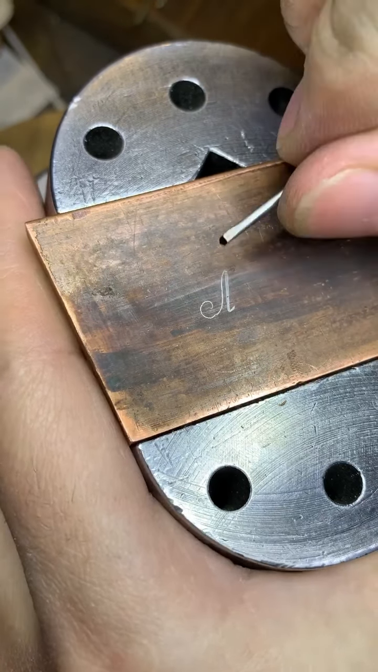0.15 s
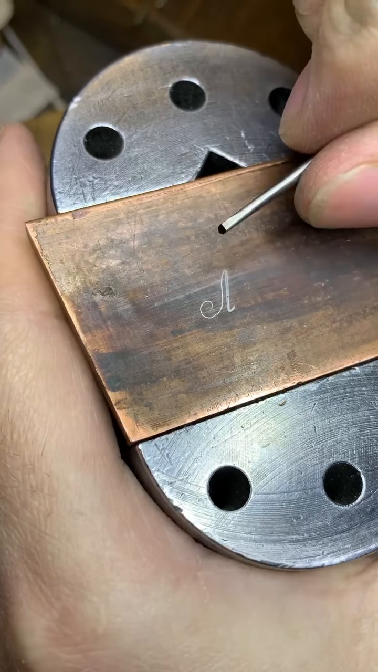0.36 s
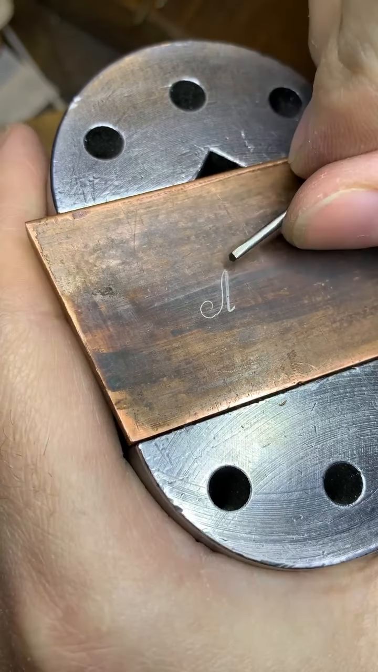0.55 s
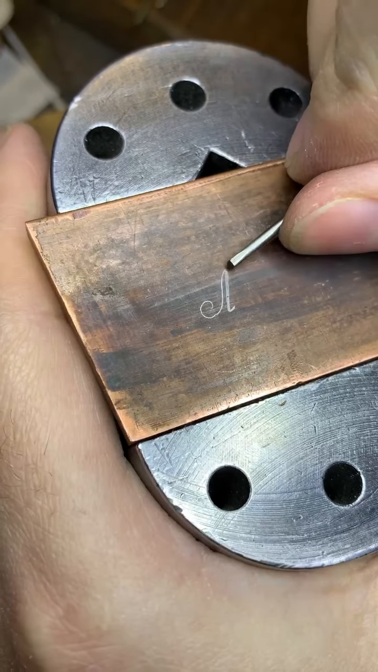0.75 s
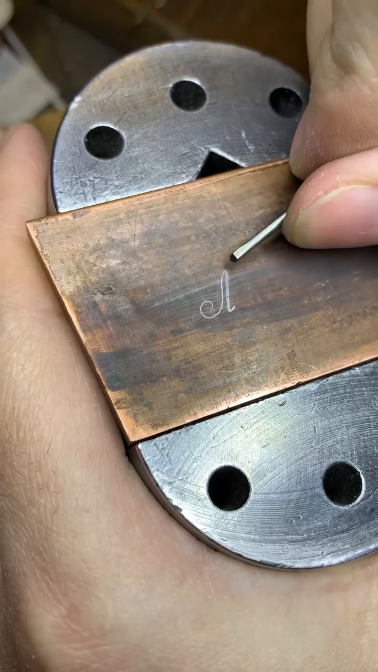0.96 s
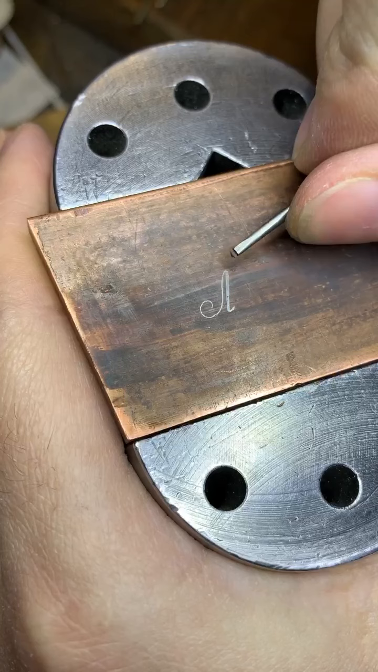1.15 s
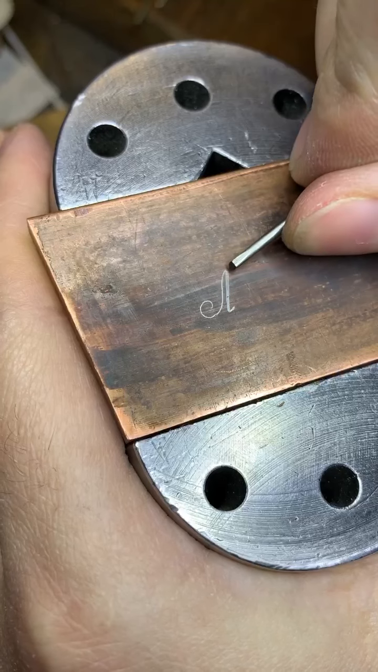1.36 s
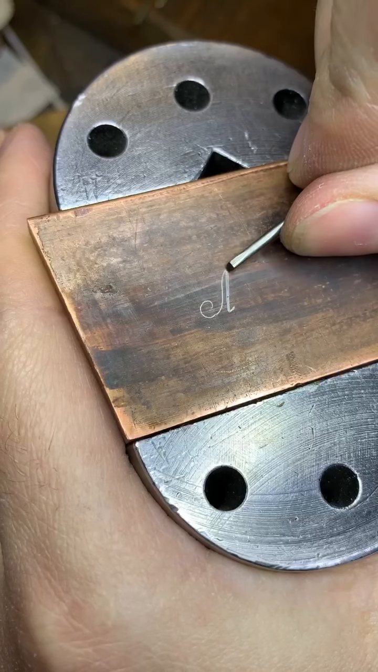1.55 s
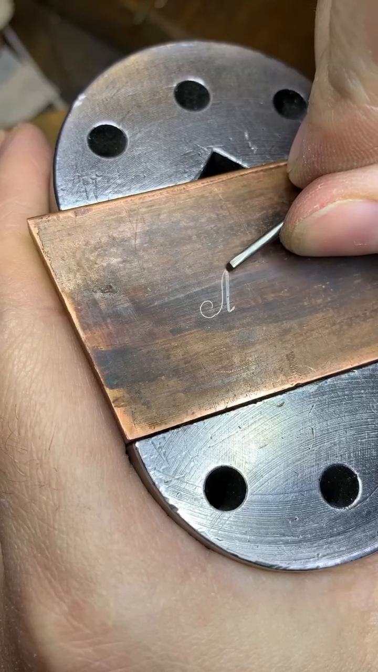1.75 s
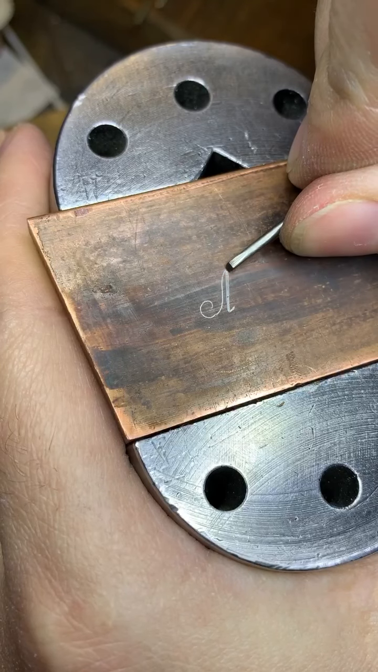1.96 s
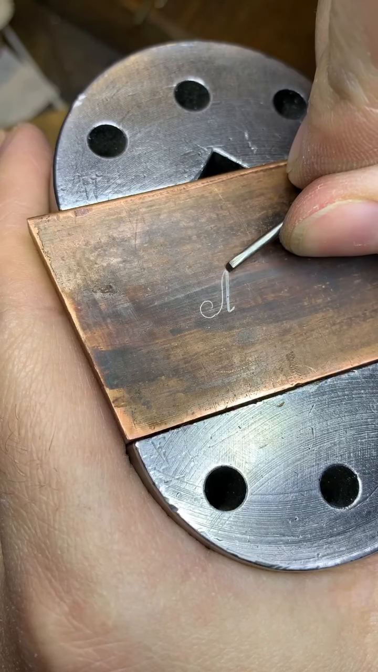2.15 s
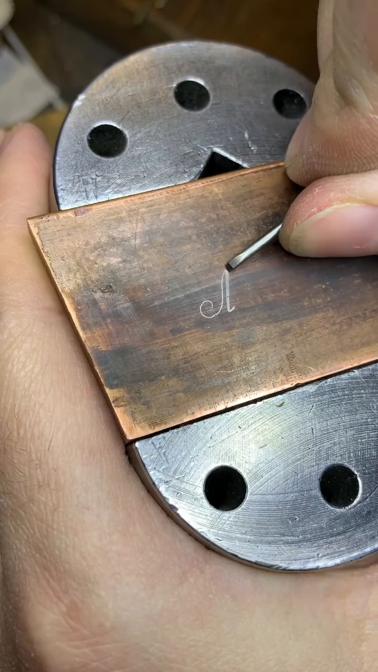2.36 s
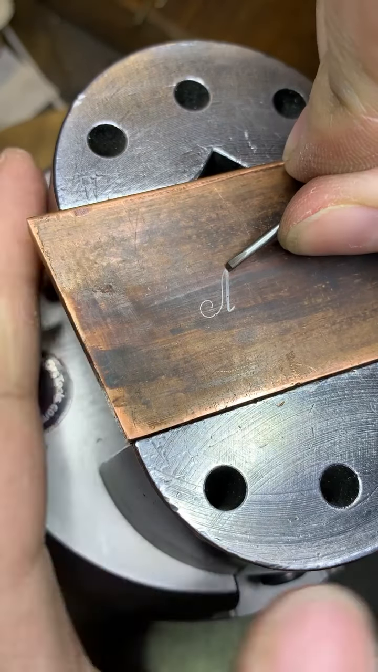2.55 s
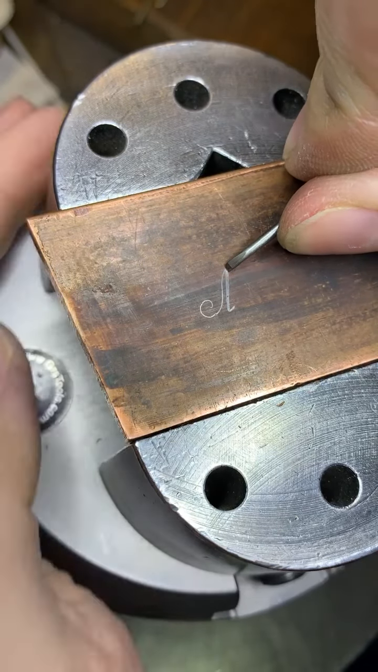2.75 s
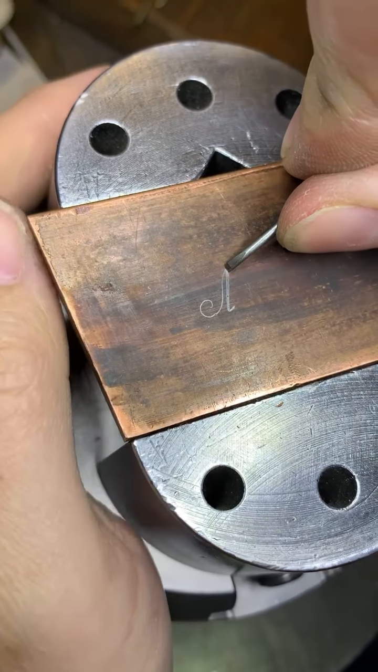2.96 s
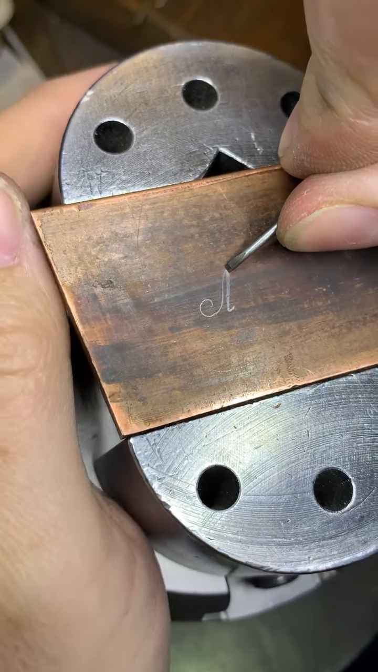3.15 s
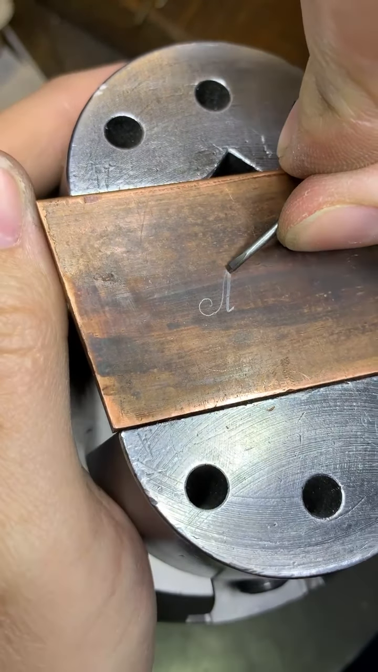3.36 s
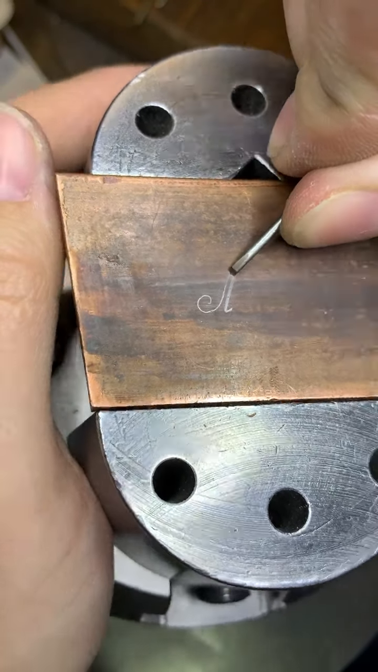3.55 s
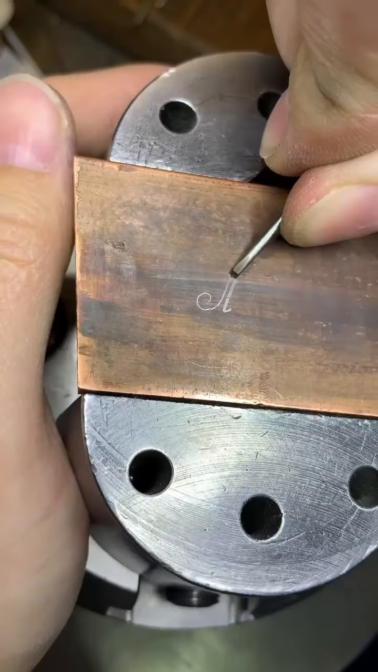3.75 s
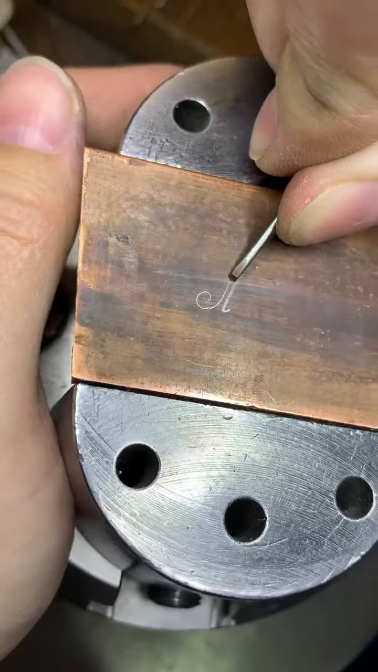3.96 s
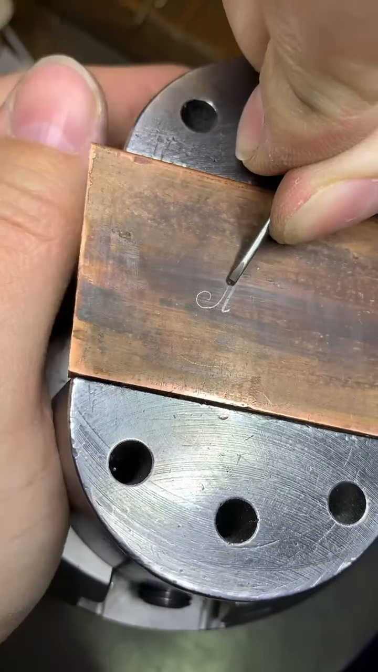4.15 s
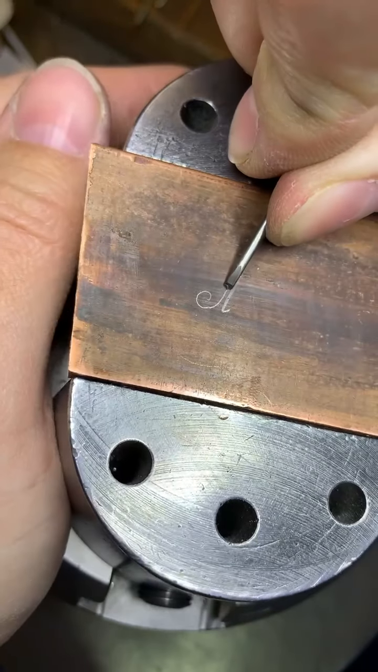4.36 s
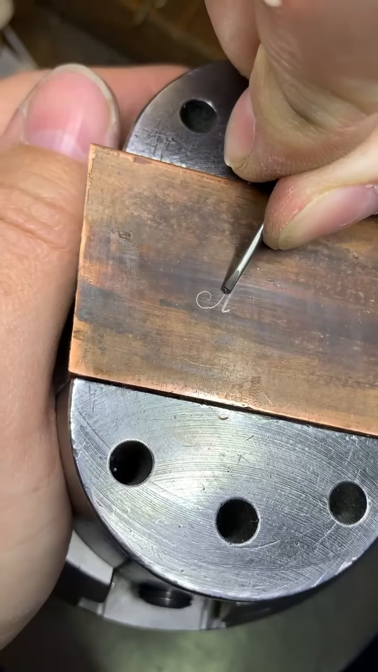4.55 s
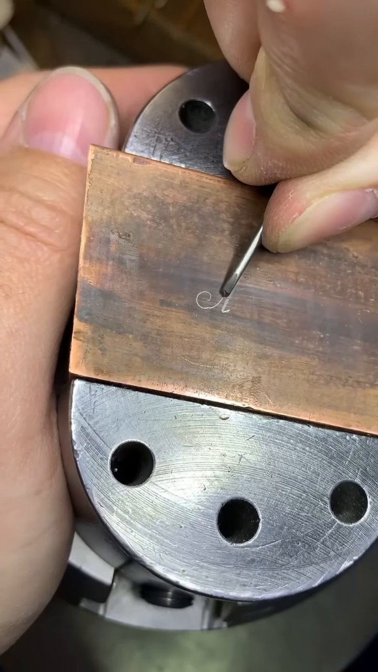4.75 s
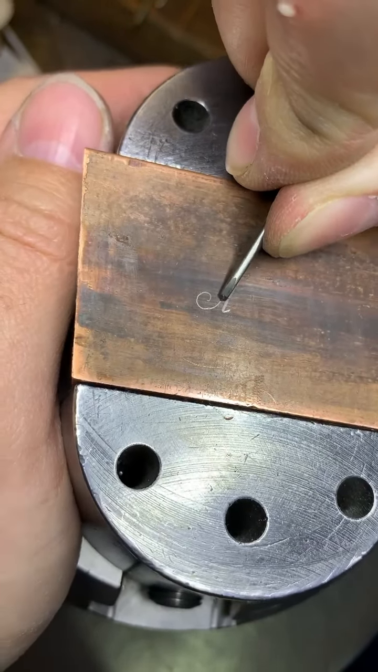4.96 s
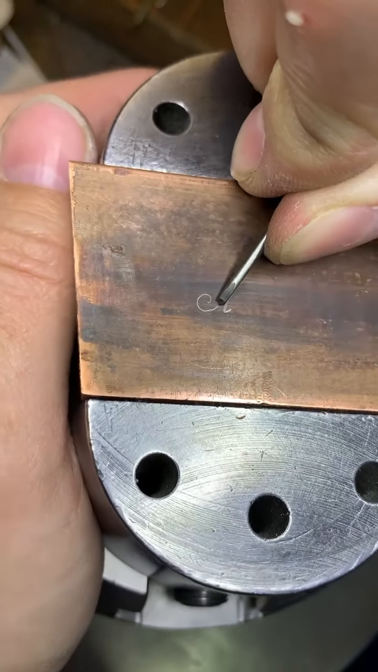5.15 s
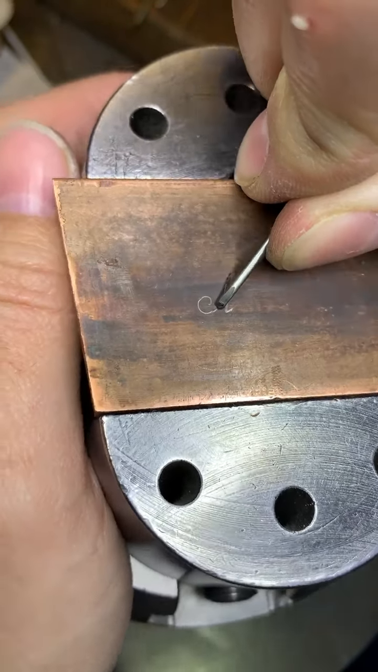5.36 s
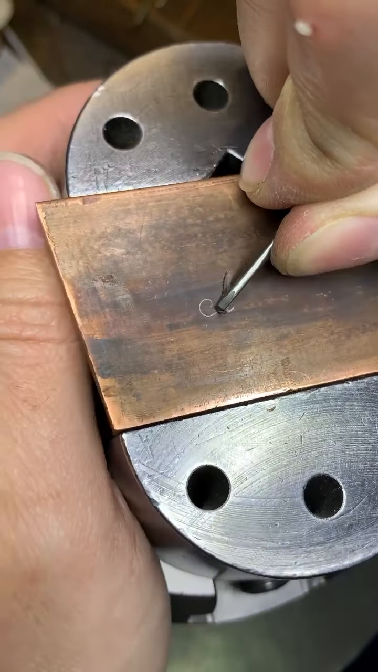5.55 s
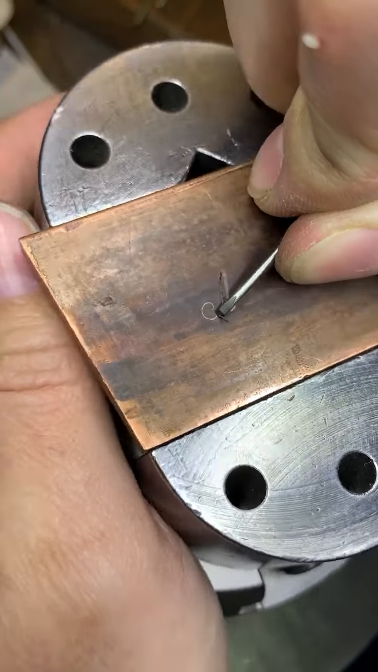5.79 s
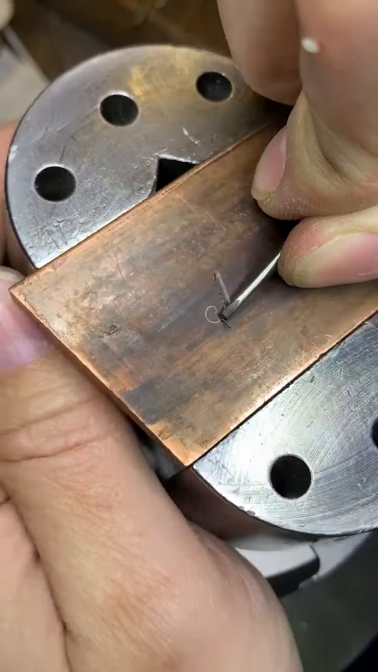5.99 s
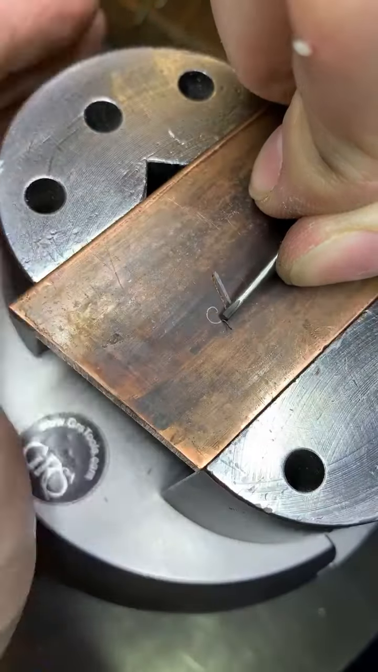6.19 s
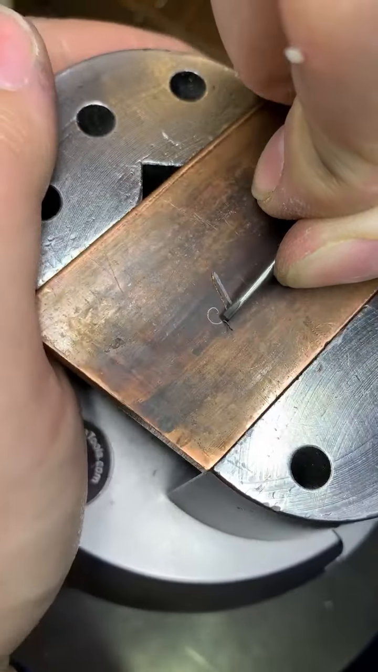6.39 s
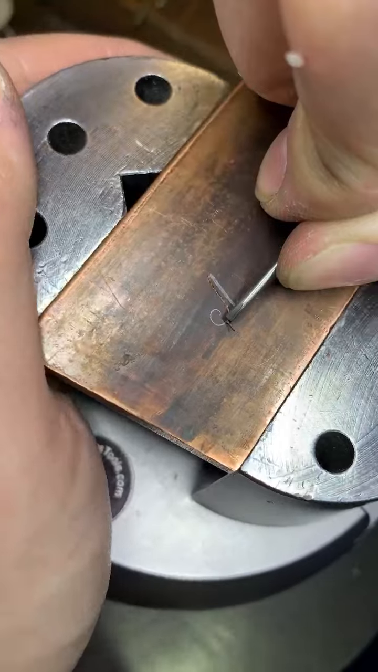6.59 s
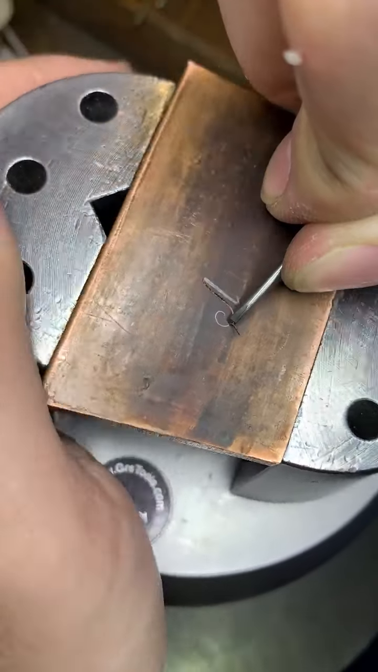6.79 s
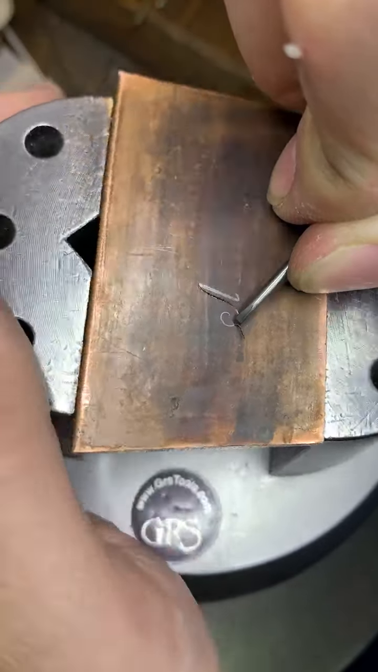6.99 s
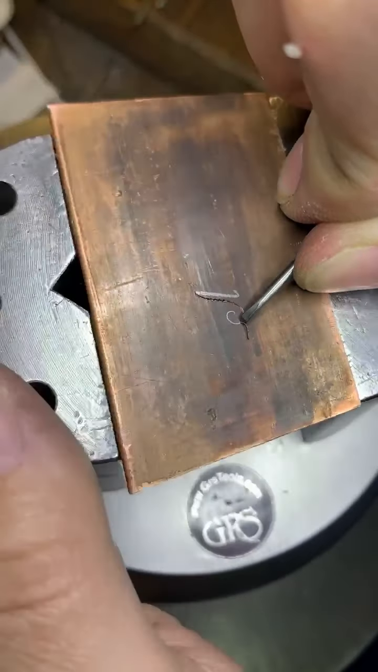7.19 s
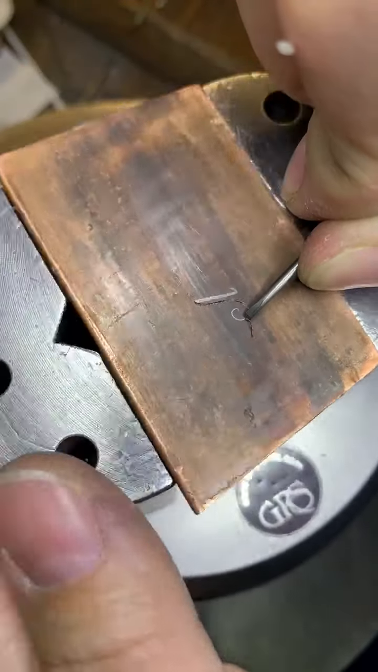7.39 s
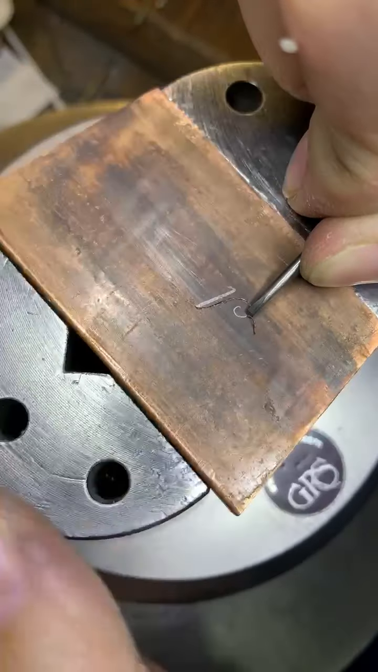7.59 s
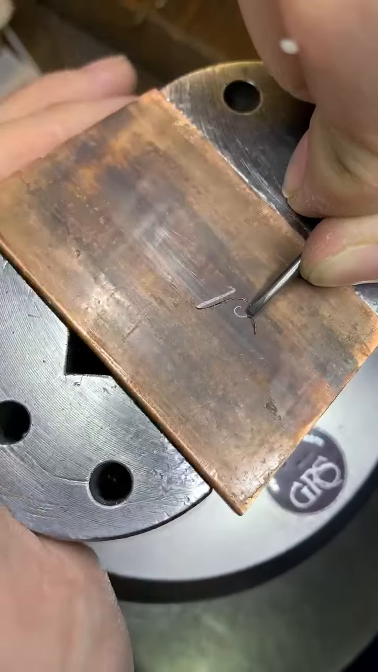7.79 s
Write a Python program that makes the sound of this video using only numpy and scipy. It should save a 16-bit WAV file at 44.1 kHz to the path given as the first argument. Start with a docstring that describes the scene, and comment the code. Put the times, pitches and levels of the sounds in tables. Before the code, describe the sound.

A powered engraving tool buzzes harshly on copper in two short bursts and a long run, then abruptly jumps to a much faster, higher whine.

```python
"""At a workbench, under a machine's hum, room rumble, air hiss and paired low thumps, a pneumatic engraving
handpiece hammers a graver through a copper plate in a ball vise: two short runs, then a long one from 2.3 s.
At 3.45 s, inside that run, playback jumps to nearly three times its speed, lifting pitches and stroke rate.
The long run stops at 6.1 s; two more follow, the last still going at the end. Piston blows ring resonances
of tool, vise and plate; shaped noise makes room and air; sines make hum and thumps; the treble ends early."""
import sys
import numpy as np
from scipy import signal
from scipy.fft import rfft, irfft, next_fast_len
from scipy.io import wavfile
from scipy.ndimage import map_coordinates

SR = 44100
rng = np.random.default_rng(int(sys.argv[2]) if len(sys.argv) > 2 else 0)


def store_pcm(level_fs):
    """Save levels as 16-bit WAV."""
    pcm = np.round(np.clip(level_fs, -1, 1) * 32767).astype(np.int16)
    wavfile.write(sys.argv[1], SR, np.atleast_2d(pcm).T)


N = 345303


def amp(db):
    """Decibels to gain."""
    return 10 ** (np.asarray(db) / 20)


def unit(x):
    """Scaled to rms 1."""
    return x / np.sqrt(np.mean(x ** 2) + 1e-20)


def along(points, hz):
    """(frequency [Hz], value) points read on a log frequency axis."""
    f, v = np.transpose(points)
    return np.interp(np.log(hz + 1), np.log(f + 1), v)


def curves(rows):
    """One value per sample for each column after the time."""
    s, *cols = np.transpose(rows)
    return [np.interp(np.arange(N) / SR, s, c) for c in cols]


def wobble(rate):
    """A smooth random curve with rate knots a second."""
    knots = rng.standard_normal(int(N * rate / SR) + 4)
    return map_coordinates(knots, [np.arange(N) * rate / SR])


def filtered(x, response, speed=1):
    """x through a response given at natural speed, its frequencies multiplied by the playback speed."""
    m = next_fast_len(N + SR // 2)
    natural_hz = np.fft.rfftfreq(m, 1 / SR) / speed
    return irfft(rfft(x, m) * response(natural_hz), m)[:N]


def modes(table):
    """The causal response of damped resonances, summed with alternating sign."""
    def response(f):
        return sum((-1) ** k * amp(db) * 1j * f * width / (hz * hz - f * f + 1j * f * width)
                   for k, (hz, width, db) in enumerate(table))
    return response


def noise(spectrum, speed):
    """Noise of rms 1, coloured by a spectrum."""
    return unit(filtered(rng.standard_normal(N), lambda hz: amp(along(spectrum, hz)), speed))


# Broad noise of the place at natural speed: (frequency [Hz], relative density [dB per Hz])
ROOM_NOISE = [(60, -17), (100, -1.5), (250, 1.5), (500, -6), (1200, -7.5), (2000, -16), (4000, -24),
              (11500, -33), (12000, -75), (22000, -120)]


def room_noise(speed):
    """The place itself: broad noise whose level wavers very slightly."""
    return amp(-54.0 + 0.15 * wobble(2.36)) * noise(ROOM_NOISE, speed)


# Handling bumps: (time [s], level [dB])
BUMPS = [(.01, -39), (.39, -42), (.6, -44), (2.47, -35), (2.72, -36.5), (2.92, -45), (3.22, -47),
         (6.15, -35), (7.66, -41)]


def rumble(speed):
    """Low resonant noise: a wavering room rumble, swollen briefly by handling bumps."""
    rumble_db, bump_s = -45.5, 0.1  # bump length at natural speed
    s, db = np.transpose(BUMPS)
    late = (np.arange(N)[:, None] / SR - s) * speed
    bumps = (amp(db) * np.exp(-(late / bump_s) ** 2)).sum(axis=1)
    resonances = modes([(13.3, 11.3, -0.5), (32.6, 54.7, -12.5)])
    low = unit(filtered(rng.standard_normal(N), resonances, speed))
    return (amp(rumble_db + 2.5 * wobble(9)) + bumps) * low


# Steady tones of the machine at natural speed: (frequency [Hz], level [dB])
HUM = [(74.875, -29), (160, -64), (320, -61.5), (336, -70), (1438, -66)]
# Its wavering bands at natural speed: (frequency [Hz], width [Hz], relative level [dB])
DRONE = [(174.6, 1.9, 3.5), (214.5, 3.1, -6.5), (438.6, 3.6, -1.5), (852, 50, -17), (1186, 11.4, -11.5)]


def machine(speed):
    """A machine's hum: nearly steady sines, and noise in narrow bands that waver."""
    t = np.arange(N) / SR * speed
    tones = sum(amp(db) * np.sqrt(2) * np.sin(2 * np.pi * (hz * t + rng.random())) for hz, db in HUM)
    bands = unit(filtered(rng.standard_normal(N), modes(DRONE), speed))
    return tones * amp(0.12 * wobble(6 * speed)) + amp(-56.5) * bands


# First thump of each pair: (time [s], peak level [dB])
THUMPS = [(-.08, -39), (.427, -38), (.881, -34), (1.38, -40), (1.949, -35), (2.566, -47), (3.145, -41),
          (3.535, -36), (3.736, -35), (3.949, -38), (4.135, -37), (4.335, -36), (4.541, -36), (4.733, -36),
          (4.937, -36), (5.147, -35), (5.341, -35), (5.547, -40), (5.739, -33), (5.921, -37), (6.12, -50),
          (6.314, -34), (6.498, -34), (6.706, -35), (6.913, -34), (7.105, -33), (7.298, -34), (7.483, -36),
          (7.66, -38)]


def thumps(speed):
    """Paired low thumps, each a soft swell of about two low cycles."""
    pair_s, second_db = .183, -6  # gap to the second thump at natural speed, and its relative level
    pairs = THUMPS + [(s + pair_s / speed, db + second_db) for s, db in THUMPS]
    out = np.zeros(N + 2 * SR)  # one second of margin at each end
    t = (np.arange(SR // 5) / SR - .1) * speed
    for s, db in pairs:
        hz, turn = 50 * (1 + 0.11 * rng.standard_normal()), rng.random()
        swell = amp(db) * np.exp(-(t / 0.02) ** 2) * np.sin(2 * np.pi * (hz * t + turn))
        out[round((s + .9) * SR):][:len(t)] += swell  # t begins .1 s ahead of the thump
    return out[SR:][:N]


# Escaping air: (time [s], level [dB])
HISS = [(0, -48), (.12, -46.5), (.78, -46.5), (.84, -77), (1.04, -70), (1.12, -56), (1.3, -51.5),
        (2.3, -51.5), (3.44, -38), (3.46, -46), (6.1, -46), (6.18, -90), (6.3, -50), (7.56, -45),
        (7.62, -87), (7.72, -56)]
# Its colour at natural speed: (frequency [Hz], relative density [dB per Hz])
AIR = [(1060, -33), (1800, -0.5), (2710, -2.5), (2910, 1.5), (6740, -1.5), (9840, 2.5), (11100, 7.5),
       (11900, 11.5), (15500, -31), (22000, -120)]


def hiss(speed):
    """Escaping air: coloured noise that follows a level curve and flutters."""
    hiss_db, = curves(HISS)
    return amp(hiss_db + 0.7 * wobble(8)) * noise(AIR, speed)


# The pedal goes down and up: (start time [s], stop time [s])
RUNS = [(0.059, 0.76), (1.255, 1.644), (2.29, 6.103), (6.287, 7.552), (7.68, 8.03)]


def pedal(speed):
    """Gain and relative pace: each run swells in slowly paced, races a little at its end, then dies."""
    attack_s, release_db_per_s = 0.13, 370  # at natural speed, like the next two times
    sag, sag_s, race, race_s = .014, .13, .011, .045  # share of pace lost at a start, gained at a stop
    t = np.arange(N)[:, None] / SR
    start, stop = np.transpose(RUNS)
    since, left = np.clip((t - start) * speed, 0, None), (stop - t) * speed
    gain = (1 - np.exp(-since / attack_s)) ** 2 * amp(release_db_per_s * np.minimum(left, 0))
    running = (since > 0) * (left > -.1)
    shift = running * (race * np.exp(-np.abs(left) / race_s) - sag * np.exp(-since / sag_s))
    return gain.max(axis=1), 1 + shift.sum(axis=1)


# Colour of the vented air at natural speed: (frequency [Hz], relative density [dB per Hz])
PUFF = [(60, -30), (200, -1), (1500, 2), (4000, 5), (11500, -19), (22000, -57)]


def vents(speed, db):
    """A short puff of air, as shaped noise, ends each run."""
    _, stop = np.transpose(RUNS)
    late = np.arange(N)[:, None] / SR - stop
    swell = np.exp(-((late * speed + 0.018) / 0.019) ** 2).sum(axis=1)
    return amp(db) * swell * noise(PUFF, speed)


def strokes(rate, speed, jitter_s, scatter_db, limp_db, limp_s, chatter, chatter_s):
    """Piston blows placed between samples; also the same blows, each with a dying burst of chatter."""
    turns = np.cumsum(rate) / SR + .5
    draw = rng.standard_normal((int(turns[-1]) + 1, 2))
    # the piston limps: strong early and weak late blows alternate, more so at some moments
    at = np.interp(np.arange(len(draw)), turns, np.arange(N))
    limp = (-1) ** np.arange(len(draw)) * amp(7.7 * wobble(3 * speed))[at.astype(int)]
    at = at + (draw[:, 0] * jitter_s + limp * limp_s) * SR / speed
    size = amp(scatter_db * draw[:, 1] - limp_db * limp)
    # a windowed sinc lets a blow fall between two samples
    tap = np.floor(at)[:, None] + np.arange(-7, 9)
    offset = tap - at[:, None]
    shape = np.sinc(offset) * np.cos(np.pi * offset / 16) ** 2
    place = np.clip(tap, 0, N - 1).astype(int)
    blows = unit(np.bincount(place.ravel(), (shape * size[:, None]).ravel(), N)[:N])
    since = turns % 1 / rate * speed  # natural seconds into the stroke
    return blows, blows + chatter * unit(np.exp(-since / chatter_s) * rng.standard_normal(N))


def bench(x, speed, wet_db, t60, drift):
    """x plus the short, weaker answer of bench and walls, whose colour drifts slowly at random."""
    t = np.arange(SR // 8) / SR * speed
    tails = rng.standard_normal((2, len(t))) * amp(-60 * t / t60) * (t > .001)
    tails = tails / np.linalg.norm(tails[0])
    one, other = signal.fftconvolve(x[None], tails, axes=1)[:, :N]
    turn = np.pi * wobble(drift * speed)
    return x + amp(wet_db) * (np.cos(turn) * one + np.sin(turn) * other)


# Resonances of vise, ball, jaws, base and plate at natural speed:
# (frequency [Hz], width [Hz], relative level [dB])
VISE = [(97.4, 19, 1), (196, 70, 12)]
BALL = [(282, 16, 0)]
JAWS = [(385.4, 5.2, -1.5), (486, 117, -4)]
BASE = [(1765, 32, -0.54), (1912, 79, -1.5)]
PLATE = [(591.6, 49.6, 1)]
# Resonances of the graver, and of its lower ring in the fast stretch, at natural speed:
# (frequency [Hz], width [Hz], relative level [dB])
GRAVER = [(3280, 410, -1), (3680, 133, 27)]
FAST_GRAVER = [(3286, 58, -5), (3628, 130, 0.5)]
TURNED = FAST_GRAVER  # the short name used in the list of fast parts
# Resonances of the stroke's click and of the handpiece's parts at natural speed:
# (frequency [Hz], width [Hz], relative level [dB])
CLICK = [(671, 92, 6), (864, 110, 11.5), (975, 226, 12.5), (1188, 360, 12), (1540, 35, -10.5),
         (2136, 33, -4)]
HANDLE = [(2634, 145, 0)]
FERRULE = [(2957, 240, 0)]
COLLET = [(3833, 80, 0)]
NECK = [(4228, 580, 0), (4260, 46, -1)]
SHANK = [(4700, 380, 0)]
BARREL = [(5760, 230, -2.7), (6080, 160, -0.76), (6640, 1300, -1.5)]
SLEEVE = [(7220, 380, -2.2), (7900, 530, 0.17)]
PISTON = [(8185, 32, 0)]
TIP = [(8540, 500, -3), (9290, 510, -2.5), (9500, 290, 2), (10200, 250, 1.5), (11450, 350, -3)]
# What rings at natural speed: (resonances, takes chatter [true or false], level [dB],
# slope with force [dB per dB], slope with angle [dB per unit])
PARTS = [(GRAVER, True, -42.5, 1.45, 5.3), (VISE, False, -53, 1.6, -1), (BALL, False, -50, 1.13, 0.9),
         (JAWS, False, -58.5, 1.6, -0.22), (PLATE, False, -49, 0.95, -2.8), (CLICK, False, -54, 1.1, .1),
         (HANDLE, False, -52, 1, -1.3), (FERRULE, False, -51.5, 0.4, 1), (NECK, True, -38.5, 0.97, 1.5),
         (SHANK, True, -45.5, 0.59, -6.5), (BARREL, False, -45.5, 0.93, -2.2), (TIP, True, -36.5, 1.14, .1),
         (SLEEVE, True, -43.5, 0.72, -1.3), (PISTON, True, -43.5, 1.46, -4)]
# What rings when played fast: (resonances, takes chatter [true or false], level [dB],
# slope with force [dB per dB], slope with turn [dB per unit])
FAST_PARTS = [(TURNED, True, -37, 0.9, -3.3), (VISE, False, -46, -0.47, 4.2), (BALL, False, -56, 0.1, -7.5),
              (JAWS, False, -45.5, 0.58, 3), (PLATE, False, -44.5, 0.37, -5.5),
              (CLICK, False, -45, 0.43, .4), (HANDLE, False, -45, 0.43, -4.3),
              (FERRULE, False, -46.5, 0.29, -0.21), (BASE, False, -50, 0.72, 1),
              (COLLET, True, -31, 1.8, 2.1), (NECK, True, -32.5, 0.81, -1.9)]
# The hand on the tool: (time [s], force [dB], angle of the tool to the plate [relative units])
HAND = [(.1, -2, 0.094), (.4, -15.5, -1.6), (.56, -9, 0.2), (.72, -7, 0.37), (1.35, -0.5, 0),
        (1.6, -10.5, .1), (2.35, 4, -0.042), (2.45, -2, .5), (2.66, 0.5, 0.86), (2.86, 1, 0.54),
        (3, 3, -0.05), (3.27, 5.5, -0.32), (3.43, 6, -0.62)]
# The same, played fast: (time [s], force [dB], turn of the vise [-1..1])
FAST_HAND = [(3.48, -4.5, -.7), (3.8, -3, -0.71), (4.3, 0, -0.87), (4.78, 1, -1), (5.2, 0, -0.84),
             (5.28, -1.5, -0.72), (5.75, -2, -0.18), (5.84, -5.5, -0.16), (6.08, -7, 0.41), (6.4, -4, 0.34),
             (6.74, 1, 0.97), (6.96, 2, 0.98), (7.2, 0.6, 1), (7.52, -1, 0.93), (7.75, -1, -0.23),
             (7.83, -4, .3)]
# Stroke rate at natural speed before the pedal's shifts: (time [s], rate [strokes per s])
PACE = [(.1, 95.8), (.7, 95.85), (1.4, 96.1), (1.6, 96.1), (2.45, 95.7), (2.8, 95.8), (3.44, 95.8),
        (3.45, 96), (3.85, 95.95), (4.2, 96.17), (4.6, 96.22), (5.1, 96.1), (5.7, 96.18), (6.05, 96),
        (6.55, 95.9), (7.1, 95.75), (7.83, 95.95)]
# How freely the holding hand lets vise and ball ring: (time [s], level [dB])
GRIP = [(.1, 4), (.7, -13), (1.5, -8), (2.4, -3), (2.8, -0.5), (3.1, .1), (3.43, -2), (3.5, 2), (4, 0.7),
        (4.6, -3), (5.2, 3), (5.8, 6.5), (6.1, -2), (6.5, -0.5), (7, 0), (7.5, 1.7), (7.8, 5)]


def handpiece(hand, parts, speed):
    """The same piston blows ring every part; force and angle or turn set how much each one sounds."""
    (pace,), (force_db, angle), (running, hurry) = curves(PACE), curves(hand), pedal(speed)
    clean, rough = strokes(pace * hurry * speed, speed, jitter_s=.000011, scatter_db=.5,
                           limp_db=0.12, limp_s=.000006, chatter=0.17, chatter_s=0.0079)
    clean = bench(clean, speed, wet_db=-13, t60=.15, drift=.3)
    rough = bench(rough, speed, wet_db=-11, t60=0.084, drift=0.3664)
    grip_db, = curves(GRIP)
    total = 0
    for table, chatters, db, grows, leans in parts:
        # a second, wider pass over the part's range keeps its skirts dark
        (low_hz, _, _), (high_hz, width, _) = table[0], table[-1]
        span = modes([(np.sqrt(low_hz * high_hz), high_hz - low_hz + 7 * width, 0)])
        ring = modes(table)
        drive = rough if chatters else clean
        sound = unit(filtered(drive, lambda f: ring(f) * span(f), speed))
        if table in (COLLET, FAST_GRAVER):  # these swing against the other parts
            sound = -sound
        elif table in (VISE, BALL):
            sound = amp(grip_db) * sound
        total = total + amp(db + grows * force_db + leans * angle) * sound
    return running * total


def playback(hand, parts, puff_db, speed):
    """Everything at the bench and around it, heard at one playback speed."""
    around = room_noise(speed) + rumble(speed) + machine(speed) + thumps(speed)
    return around + hiss(speed) + vents(speed, puff_db) + handpiece(hand, parts, speed)


def scene():
    """Natural speed until the jump, then a quick fade into the fast playback."""
    cut_s, fade_s = 3.4465, .014
    t = np.arange(N) / SR
    slow = playback(HAND, PARTS, puff_db=-69, speed=1)
    fast = playback(FAST_HAND, FAST_PARTS, puff_db=-44, speed=2.8737)
    # the first stretch ends lower in the treble
    treble_end = [(11650, -0.5), (11900, -33), (12500, -32)]
    slow = filtered(slow, lambda hz: amp(along(treble_end, hz)))
    fade_out = np.clip((cut_s - t) * 500, 0, 1)
    fade_in = np.clip((t - cut_s) / fade_s, 0, 1)
    return (slow * fade_out + fast * fade_in)[None]


# Overall treble response: (frequency [Hz], level [dB])
TREBLE = [(20, 0), (11000, 0), (12300, -8.5), (12750, -23), (12900, -32)]


def record(dry):
    """The whole sound: its treble droops and stops below 13 kHz."""
    top_hz = 12900
    return filtered(dry[0], lambda hz: amp(along(TREBLE, hz)) * (hz < top_hz))[None]


dry = scene()
out = record(dry)
store_pcm(out)
```